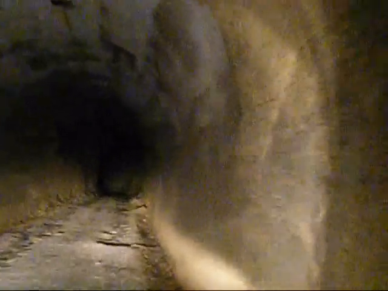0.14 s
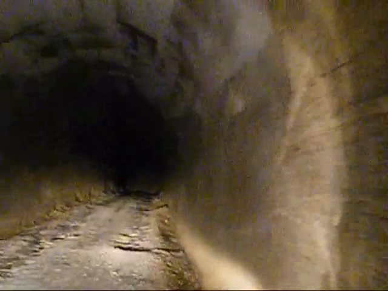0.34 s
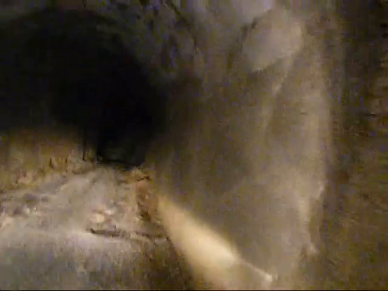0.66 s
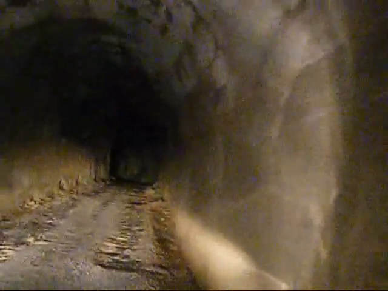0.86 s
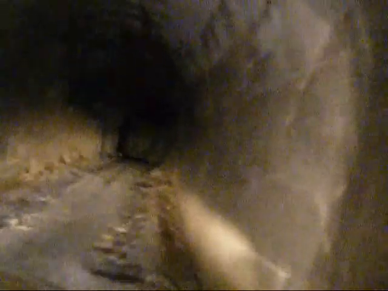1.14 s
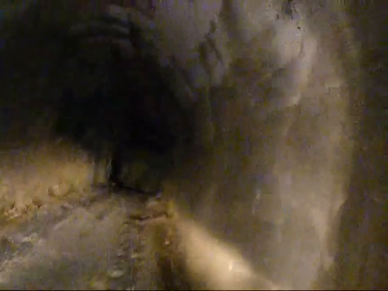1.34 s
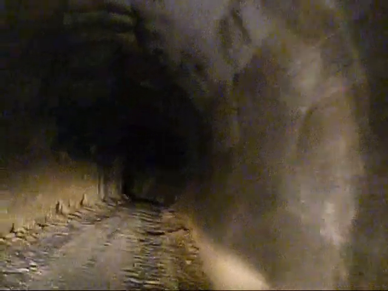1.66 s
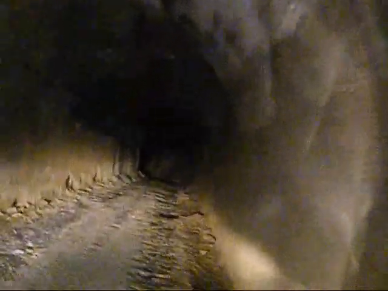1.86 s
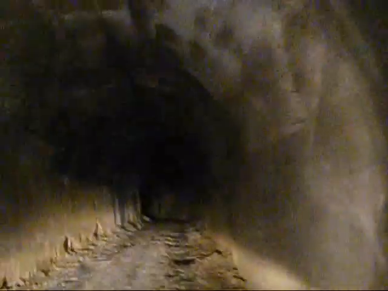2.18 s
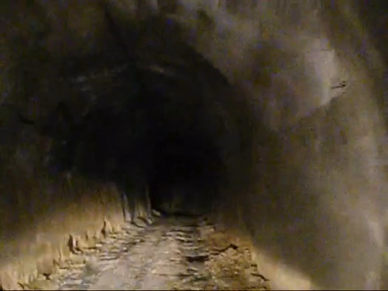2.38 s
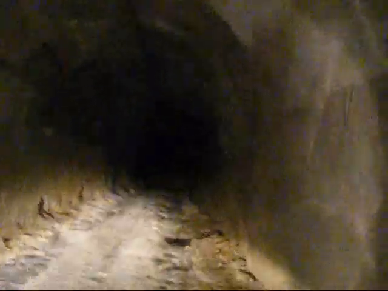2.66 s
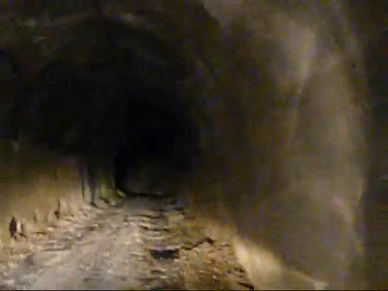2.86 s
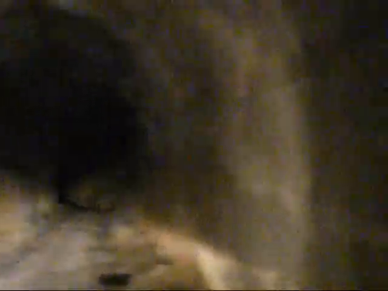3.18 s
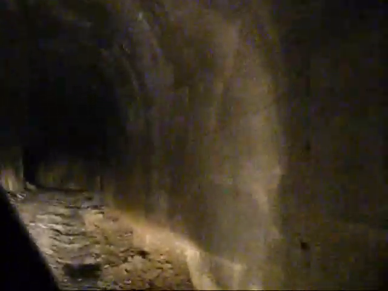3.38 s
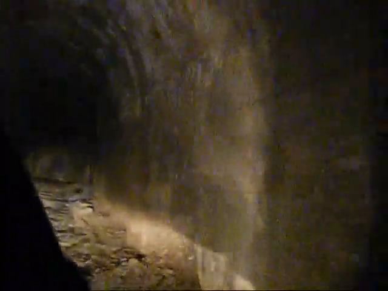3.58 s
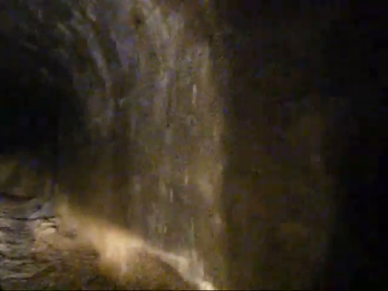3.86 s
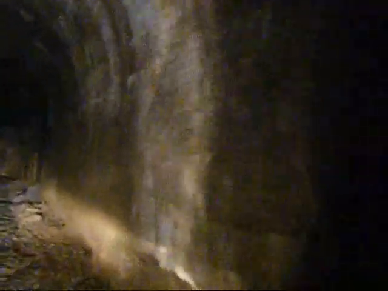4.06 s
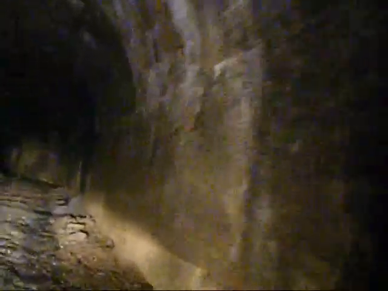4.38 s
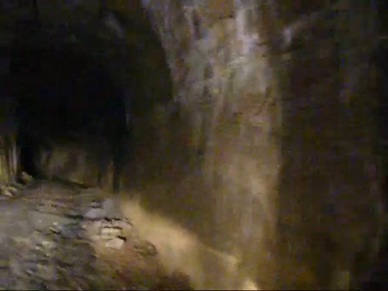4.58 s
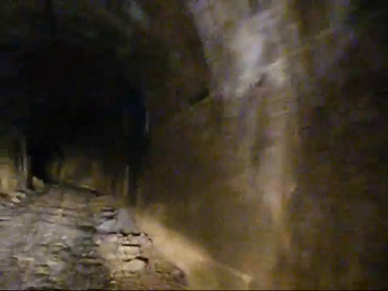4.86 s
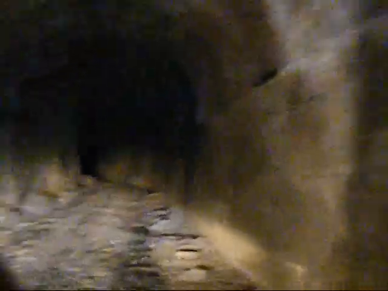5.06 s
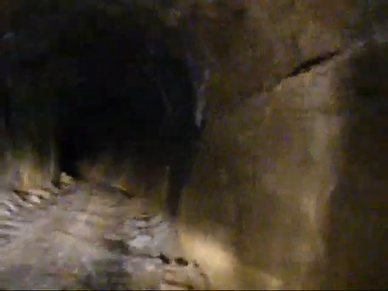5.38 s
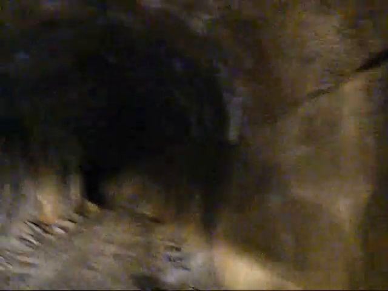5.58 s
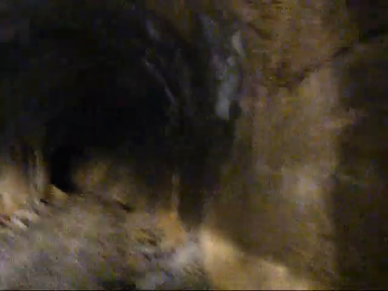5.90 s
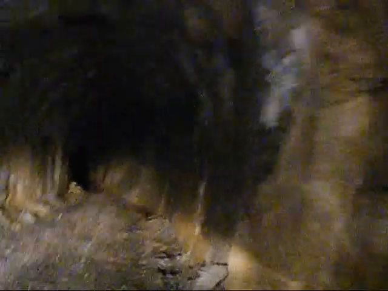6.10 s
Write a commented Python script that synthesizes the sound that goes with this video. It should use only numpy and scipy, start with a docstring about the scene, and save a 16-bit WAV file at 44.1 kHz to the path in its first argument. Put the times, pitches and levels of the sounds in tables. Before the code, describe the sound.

Rough, gritty wind roar with hard slaps and dull thumps dominates, over faint tyre crunch and a low steady car rumble in a tunnel.

```python
"""A rock tunnel, with a car rolling over gravel and a small camera held at its open window.
Turbulent air buffets the microphone in fluttering gusts: coloured noise read at a rate set by the air speed.
Shaped noise bursts add slaps, thumps and knocking stones; random clicks with an echo make the tyre crunch.
The car is a steady low rumble, also of shaped noise.
The camera limits the peaks and holds each of its coarse samples, which lays a gritty fizz over everything."""
import sys
import numpy as np
from scipy import signal
from scipy.fft import rfft, irfft
from scipy.io import wavfile
from scipy.ndimage import uniform_filter1d, minimum_filter1d, map_coordinates

SR = 44100
rng = np.random.default_rng(int(sys.argv[2]) if len(sys.argv) > 2 else 0)


def store_wav(level_fs):
    """Save 16-bit WAV to argv[1]."""
    pcm = np.round(np.clip(np.atleast_2d(level_fs), -1, 1) * 32767)
    wavfile.write(sys.argv[1], SR, pcm.T.astype(np.int16))


N = 274904
TIME = np.arange(N) / SR  # s
HZ = np.fft.rfftfreq(N, 1 / SR)

# hard slaps of air on the microphone: (time [s], level before the envelope [dB])
SLAPS = [(0.037, 7), (0.151, -3), (0.219, -6), (0.405, -10), (0.69, -12), (0.71, 1), (0.835, -9),
         (1.124, 0), (1.204, -5), (1.257, -10), (2.504, -8), (2.733, -24), (2.97, -11), (3.057, -11),
         (4.531, -4), (4.724, 9), (4.841, -11), (5.075, -4.5), (5.103, -2.5), (5.141, -9), (5.176, -18),
         (5.291, -12), (5.329, -2.5), (5.378, -8), (5.603, -13), (5.818, -9)]
# spectrum of the low-pressure core of a large vortex: (frequency [Hz], relative density [dB per Hz])
VORTEX = [(20, -20), (45, -10.5), (90, -3), (160, -1.5), (260, -3.5), (450, -19.5), (900, -32), (2000, -70)]


def wind(speedup=0.23, tearing_share=0.72, spatter_db=4.0, buffet_db=-2.5, stall_db=-4, stall_speed=1.018):
    """Turbulent pressure on the microphone; the faster an eddy, the louder and brighter it is."""
    # airstream, slack while the camera is turned aside:
    # (time [s], buffeting level before buffet_db [dB], air speed [factor on the usual one])
    airstream = [(0, -11.5, 1.045), (.53, -6.5, 1.085), (.8, -12, 1.05), (1.06, -7.5, 1.065),
                 (1.33, -11.5, 0.93), (1.53, -8.5, 0.99), (1.9, -8, 0.98), (2.25, -10, 1),
                 (2.48, -8, 1.024), (2.84, -9.5, .98), (3.2, -10.5, 0.92), (3.5, -10.5, 0.8),
                 (3.66, -14, 0.62), (4.03, -10, .63), (4.3, -13.5, .66), (4.62, -9, .93),
                 (5.2, -11.5, 0.94), (5.65, -9, 1.063), (6.23, -10.5, 0.93)]
    # buffeting at the usual air speed: (frequency [Hz], relative density [dB per Hz])
    buffeting = [(20, -28), (35, -34), (60, -10.5), (100, -3.5), (170, 0), (280, 1), (480, 0), (720, -5),
                 (1000, -11), (1400, -18), (2200, -38), (4000, -77)]
    # tearing of the smallest eddies: (frequency [Hz], relative density [dB per Hz])
    tearing_spectrum = [(300, -28), (700, 8.5), (1100, -1.5), (1600, 2.5), (2200, -2), (2900, -10.5),
                        (3800, -28), (5400, -71)]
    # fast gusts that tear at the microphone port: (middle [s], length [s], extra tearing [dB])
    gusts = [(0.046, 0.041, 7.5), (0.345, 0.12, 7), (0.513, 0.17, 7.5), (.73, 0.23, 6.5), (1.23, 0.27, 8.5),
             (1.506, 0.058, 8), (2.022, 0.34, 5), (2.89, 0.18, 6.5), (3.908, 0.087, 5.5),
             (4.025, 0.018, 8.5), (4.34, 0.09, 7), (4.601, 0.21, 7.5), (4.89, 0.13, 9), (5.521, 0.15, 5)]
    tear_base_db, tear_db_per_speed = -28, 2  # at the usual air speed, and per unit of the speed factor

    level_db, speed = curves(airstream)
    eddies_db = lulls() + slap_surges() + eddying()

    # a frozen pattern of eddies is carried past, so its whole spectrum slides with the air speed
    travelled = np.cumsum(speed * gain_of(speedup * eddies_db))
    pattern = coloured(rng.standard_normal(N), buffeting)
    passing = map_coordinates(pattern, [travelled], order=3, mode="grid-wrap")
    pressure = passing * swirl(0.99, eddies_db)

    # as the flow slows and stalls, its fine turbulence gives way to separate large vortices
    stall = np.clip(stall_speed - speed, 0, 1)
    fine = pressure * gain_of(stall_db * stall)
    pressure = fine + vortices(stall) * swirl(0.83, eddies_db)

    # the smallest eddies tear off in short bursts inside each surge, strongest in the listed gusts
    gusts_db = sum(db * bell(s, length) for s, length, db in gusts)
    tear_db = tear_base_db + tear_db_per_speed * (speed - 1) + gusts_db
    bursts_db = tearing_share * eddies_db + spatter_db * flutter(slow_hz=30, fast_hz=266)
    tearing = coloured(rng.standard_normal(N), tearing_spectrum) * swirl(0.91, bursts_db)
    return pressure * gain_of(level_db + buffet_db) + tearing * gain_of(tear_db)


def lulls():
    """The flow presses harder, lets go of the microphone and takes hold again; in dB before swirl()."""
    # (start [s], length [s], change [dB])
    lull_rows = [(0.09, 0.023, -5), (0.89, 0.03987, -5), (1.263, 0.0596, -4), (1.411, 0.01486, -6),
                 (2.123, .028, -7), (2.24, 0.0325, -7), (2.674, 0.044, -10), (3.19, .052, -9),
                 (3.348, 0.02138, -8), (3.54, 0.04496, -7), (3.739, 0.02295, -5), (4.099, 0.0175, -10),
                 (4.195, .035, -7), (5.189, .085, -4), (5.299, 0.0227, -7), (5.463, 0.0238, -7.5)]
    swell_db, swell_s = 2, 0.022  # the pressure builds up just before each lull
    change_db = 0
    for s, length, db in lull_rows:
        change_db = change_db + swell_db * bell(s - swell_s / 2, swell_s)
        change_db = change_db + db * lull(s, length)
    return change_db


def lull(s, length, drop_s=0.004074, recover_s=0.018):
    """Sets in quickly at time s, holds, and recovers more slowly; 0 to 1."""
    onset = np.clip((TIME - s) / drop_s, 0, 1)
    return onset * np.clip((s + length - TIME) / recover_s + 0.5, 0, 1)


def slap_surges(surge_db=3.5, length_s=0.011, gap_db=-4.5, gap_s=0.011):
    """Around each slap the flow first draws back, then surges; in dB before swirl()."""
    return sum(gap_db * bell(s - gap_s / 2, gap_s) + surge_db * bell(s + length_s / 2, length_s)
               for s, _ in SLAPS)


def eddying(flutter_db=2.5, surge_db=1.0, sag_db=0.17, build_db=1.67):
    """Quick flutter on slower surges, which sag deeper than they swell; in dB before swirl()."""
    quick = flutter(slow_hz=56.2, fast_hz=142.6)
    surge = flutter(slow_hz=17.6, fast_hz=41.3)
    sagging = surge_db * surge - sag_db * (surge ** 2 - 1)
    return flutter_db * quick + build_db * building() + sagging


def building(per_s=55, grow_s=0.011):
    """Eddies that grow and then break off at once, at random moments; rms 1."""
    breaks = (rng.random(N) < per_s / SR) * 1.0
    # a decay run backwards in time grows towards each break
    growth = signal.lfilter([1], [1, -np.exp(-1 / (grow_s * SR))], breaks[::-1])[::-1]
    growth = smoothed(np.sqrt(growth), 0.0011)
    return evened(growth - growth.mean())


def swirl(depth, eddies_db, steadiness=0.27):
    """Gain of the eddies, rms 1; they partly share out the power of a gust rather than add to it."""
    gain = gain_of(depth * eddies_db)
    local_power = smoothed(gain ** 2, 0.72) + 1e-9
    return evened(gain / local_power ** (steadiness / 2))


def vortices(stall, per_s=95, vortex_db=-0.4, spread_db=4):
    """Large vortices pass at uneven intervals, more strongly in stalled air; each core is a dull suction thump."""
    passing = rng.random(N) < per_s / SR
    cores = passing * gain_of(spread_db * rng.standard_normal(N).clip(-2, 1.5))
    return -gain_of(vortex_db) * np.sqrt(stall) * coloured(cores - cores.mean(), VORTEX)


def slaps(decay_s=0.0034):
    """A tight vortex bursts right at the microphone port: a short burst of shaped noise."""
    # (frequency [Hz], relative density [dB per Hz])
    slap_spectrum = [(120, -12.5), (300, 7.5), (600, 5), (950, -18.5), (1500, -13), (2300, -12),
                     (3200, -19.5), (4500, -47)]
    force = sum(gain_of(db) * struck(s, decay_s) for s, db in SLAPS)
    return force * coloured(rng.standard_normal(N), slap_spectrum)


def thumps(decay_s=0.011):
    """The largest vortices give the microphone a longer, dull blow."""
    # thumps in the slack air: (time [s], level before the envelope [dB])
    thump_rows = [(3.606, -14), (3.637, -1), (3.79, -16), (3.953, -5), (4.02, -1.5), (4.119, -6),
                  (4.175, -7), (4.36, -4)]
    force = sum(gain_of(db) * struck(s, decay_s) for s, db in thump_rows)
    return force * coloured(rng.standard_normal(N), VORTEX)


def tyres(grains_per_s=1800, spread_db=1.0, grind=0.17, clump_db=1.5):
    """Countless stones click and grind under the tread, in clumps, with an echo from the tunnel."""
    # loose stones under the tyres: (time [s], crunch level from 2600 to 4600 Hz [dB])
    gravel = [(0, -45), (.65, -41.5), (1, -48), (2.1, -43.5), (3.12, -43), (3.35, -36), (4.6, -36.5),
              (5.15, -37.5), (5.8, -42), (6.23, -36)]
    # (frequency [Hz], relative density [dB per Hz])
    crunch_spectrum = [(200, -24), (600, 4), (1200, -7), (1900, -1.5), (2600, -2.5), (3300, -5.5),
                       (4000, -13), (4700, -20.5), (5500, -28.5)]
    # stretches where the gravel crunch stands out louder, as in a lull of the wind:
    # (start [s], length [s], added crunch level from 2600 to 4600 Hz [dB])
    louder_stretches = [(2.666, .09, -39.5), (3.25, 0.04, -30), (3.846, 0.11, -31), (4.054, 0.022, -29),
                        (4.28, .16, -33.5), (5.442, 0.069, -36)]

    crunch_db, = curves(gravel)
    sizes = gain_of(spread_db * np.minimum(rng.exponential(1, N), 4)) * rng.choice([-1, 1], N)
    clicks = sizes * (rng.random(N) < grains_per_s / SR) + grind * rng.standard_normal(N)
    clicks = clicks * swirl(clump_db, flutter(slow_hz=1.7, fast_hz=77.0))
    crunch = coloured(tunnel(clicks), crunch_spectrum)
    crunch = crunch / band(crunch, 2600, 4600).std()
    added_power = sum((gain_of(db) * stretch(s, length)) ** 2 for s, length, db in louder_stretches)
    return crunch * np.sqrt(gain_of(crunch_db) ** 2 + added_power)


def stretch(s, length, rise_s=0.014, fade_s=0.0073):
    """Envelope of a louder stretch of crunch: rises from time s, holds, and dies away."""
    rise = np.clip((TIME - s) / rise_s, 0, 1)
    return rise * np.exp(-np.clip((TIME - s - length) / fade_s, 0, 30))


def stones(decay_s=0.0069, width=0.18):
    """Each stone squeezed out from under a tyre gives a short, rough knock of narrow-band noise."""
    # (time [s], level before the envelope [dB], middle of the band [Hz])
    stone_rows = [(3.852, -16, 1760), (3.871, -12.5, 1897), (3.896, -13, 1110), (3.922, -23, 2514)]
    knocks = 0
    for s, db, hz in stone_rows:
        rough = evened(band(rng.standard_normal(N), hz * (1 - width), hz * (1 + width)))
        knocks = knocks + gain_of(db) * struck(s, decay_s) * rough
    return knocks


def tunnel(x, t60=0.33, wet_db=-9):
    """The rock walls slide past, so their echo is an ever-changing wash that follows the power of x."""
    tail = gain_of(-60 * TIME[:SR] / t60) ** 2  # decay of power, t60 in s
    power = signal.fftconvolve(x ** 2, tail / tail.sum())[:N]
    return x + gain_of(wet_db) * np.sqrt(abs(power)) * rng.standard_normal(N)


def car(level_db=-28):
    """Engine and rolling noise together, an even rumble of shaped noise."""
    # (frequency [Hz], relative density [dB per Hz])
    rumble_spectrum = [(25, -29), (70, 2), (140, 5), (300, -3.5), (600, -24), (1200, -5.5), (2500, -46),
                       (5000, -34)]
    return gain_of(level_db) * coloured(rng.standard_normal(N), rumble_spectrum)


def gain_of(db):
    """Decibels to amplitude."""
    return 10 ** (np.asarray(db) / 20)


def evened(x):
    """Scales to rms 1."""
    return x / np.sqrt(np.mean(x ** 2) + 1e-20)


def curves(rows):
    """Each column of a table, joined by straight lines in time."""
    s, *columns = np.transpose(rows)
    return [np.interp(TIME, s, c) for c in columns]


def coloured(x, points):
    """Filters x by a spectrum of (Hz, dB) points, straight over log frequency; rms 1."""
    f, db = np.transpose(points)
    response = gain_of(np.interp(np.log(HZ + 1), np.log(f), db))
    return evened(irfft(rfft(x) * response, N))


def band(x, low_hz, high_hz):
    """The part of x between two frequencies."""
    return irfft(rfft(x) * ((HZ >= low_hz) & (HZ < high_hz)), N)


def flutter(slow_hz, fast_hz):
    """Random wandering of rms 1, mostly between two rates."""
    shape = HZ / np.hypot(HZ, slow_hz) / (1 + (HZ / fast_hz) ** 2)
    return evened(irfft(rfft(rng.standard_normal(N)) * shape, N))


def bell(s, length):
    """A flat-topped bump centred at time s, with the given width at half height."""
    u = (2 * (TIME - s) / length) ** 2
    return np.exp2(-np.minimum(u * u, 20))


def struck(s, decay_s):
    """An envelope that leaps up at time s and dies away; it peaks near 0.7."""
    age = np.clip((TIME - s) / decay_s, 0, 30)
    return (1 - np.exp(-10 * age)) * np.exp(-age)


def smoothed(x, seconds):
    """Two running means in a row, which make a triangular window."""
    size = max(int(seconds * SR), 1)
    return uniform_filter1d(uniform_filter1d(x, size), size)


def scene():
    """Wind, gravel and car at one microphone."""
    return (wind() + slaps() + thumps() + tyres() + stones() + car())[None]


def limited(x, ceiling=0.93, hold_s=0.002):
    """A fast limiter turns down each peak that would pass the ceiling."""
    gain = np.minimum(1, ceiling / (abs(x) + 1e-9))
    size = max(int(hold_s * SR), 2)
    return x * uniform_filter1d(minimum_filter1d(gain, size), size)


def record(dry):
    """Limiter, then a low sample rate whose held steps mirror the sound into the treble, then the band limit."""
    camera_hz, edge_hz = 11024, 15700  # sample rate of the camera, upper edge of the band
    sound = limited(band(dry[0], 0, camera_hz / 2))
    last_sample = np.floor(TIME * camera_hz) * SR / camera_hz
    steps = map_coordinates(sound, [last_sample], order=1, mode="nearest")
    lowpass = signal.firwin(511, edge_hz, window=("kaiser", 9), fs=SR)
    return signal.oaconvolve(steps, lowpass, "same")[None]


dry = scene()
out = record(dry)
store_wav(out)
```